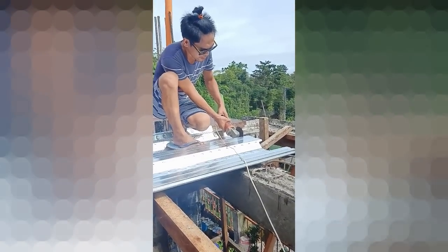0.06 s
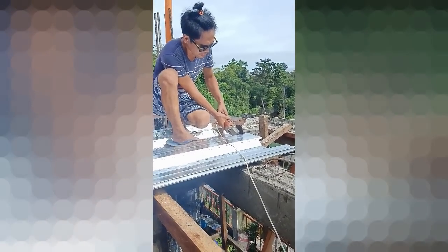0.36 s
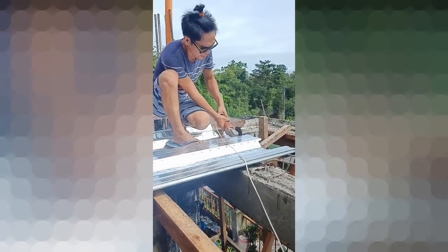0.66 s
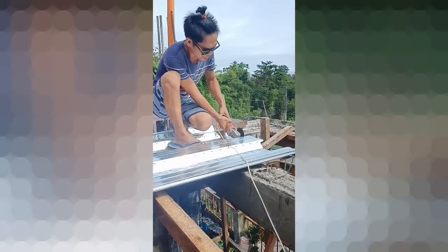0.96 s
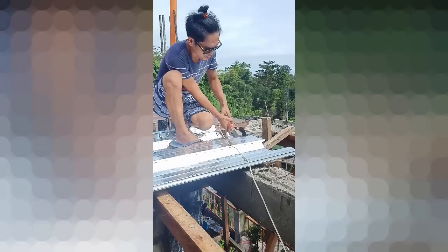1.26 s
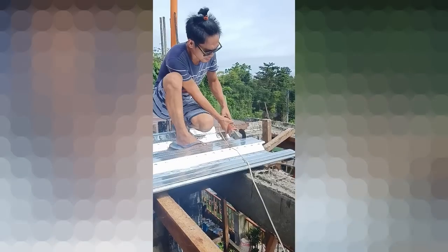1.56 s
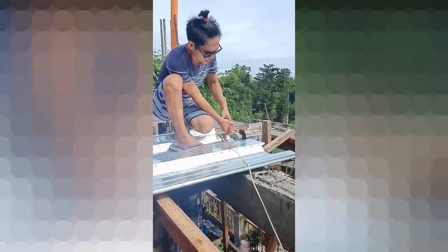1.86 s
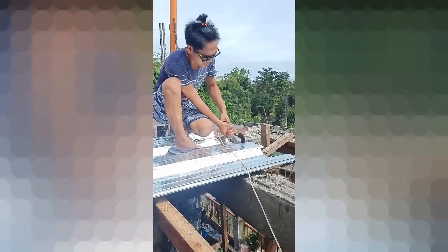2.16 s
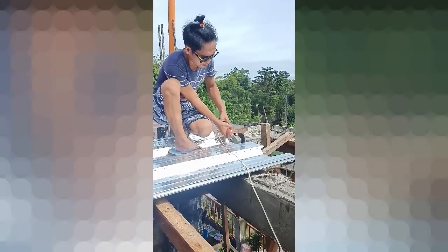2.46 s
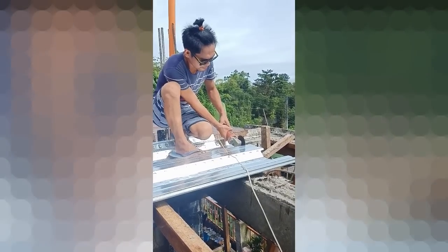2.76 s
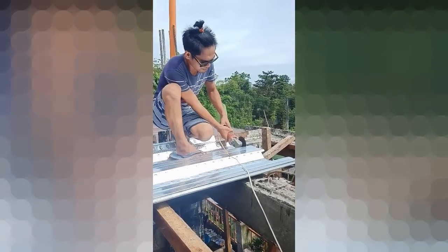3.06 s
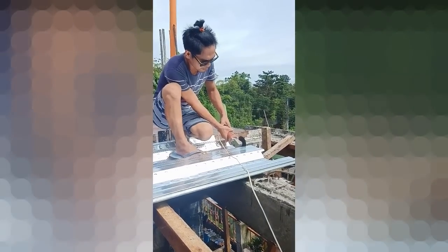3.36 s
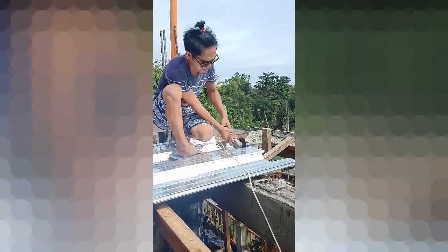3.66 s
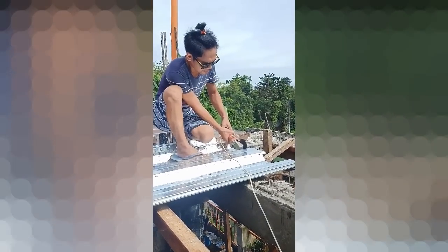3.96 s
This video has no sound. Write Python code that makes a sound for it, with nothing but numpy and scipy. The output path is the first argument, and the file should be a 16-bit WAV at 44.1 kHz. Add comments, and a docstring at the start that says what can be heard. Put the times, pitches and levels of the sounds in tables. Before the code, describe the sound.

Continuous buzzing whine of a disc cutter grinding sheet metal outdoors, light gusts crackling.

```python
"""Disc cutter on roofing sheet

A hand-held cutter works through thin sheet on an open building site, some metres away. The disc bites
once a turn, a periodic force whose overtones slide through the sheet's resonances as it slows under load.
Single overtones lock on and squeal; the abrasive edge rasps and hisses all along.
Gusts buffet the left port of the microphone with rumble, crackle and pops."""
import sys
import numpy as np
from scipy import signal
from scipy.fft import rfft, irfft
from scipy.io import wavfile
from scipy.ndimage import uniform_filter1d

SR = 44100
rng = np.random.default_rng(int(sys.argv[2]) if len(sys.argv) > 2 else 0)


def to_wav(sig):
    """Store sig (one row per channel, or 1-D mono) as 16-bit WAV at the path in sys.argv[1].

    Samples outside -1..1 are clipped; the rate is SR.
    """
    pcm = np.clip(np.atleast_2d(sig), -1, 1) * 32767
    pcm = np.round(pcm).astype(np.int16)
    wavfile.write(sys.argv[1], SR, pcm.T)  # frames by channels


N = 176400
PORT_PHASE_RAD = 0.83  # scale of the phase spread between the microphone's ports

# Relative strength of the abrasive noise: time_s, rasp_db, hiss_db
GRINDING_LEVELS = [(0.0, -67, -59), (0.27, -65, -65), (0.78, -62, -62.5), (0.92, -54.5, -64.5),
                   (1.08, -52.5, -65), (1.5, -52.5, -61), (1.62, -48, -62.5), (1.73, -52, -62),
                   (1.83, -52, -62.5), (1.92, -46, -59.5), (2.1, -55, -64.5), (2.91, -53, -63.5),
                   (3.06, -48.5, -60), (3.27, -55, -62), (3.54, -53.5, -58), (3.7, -67, -62.5),
                   (4.0, -61, -61.5)]


def undb(db):
    """Amplitude ratio of a level in decibels."""
    return 10 ** (np.asarray(db) / 20)


def unit(x):
    """Normalisation to an RMS of 1."""
    return x / np.sqrt(np.mean(x ** 2))


def curve(rows, column=1):
    """Linear interpolation of one table column over time."""
    rows = np.array(rows)
    return np.interp(np.arange(N) / SR, rows[:, 0], rows[:, column])


def bins():
    """Frequencies of the spectrum in Hz."""
    return np.arange(N // 2 + 1) * SR / N


def colour(rows):
    """Gains for each dB column of a table, interpolated over log frequency."""
    hz, *columns = np.array(rows, float).T
    return undb([np.interp(np.log(bins() + 1), np.log(hz), db) for db in columns])


def wander(size, step):
    """Low-pass noise of RMS 1, correlated over about step points."""
    step = max(int(step), 1)
    smoothed = uniform_filter1d(rng.standard_normal(size), step, mode="wrap")
    return unit(uniform_filter1d(smoothed, step, mode="wrap"))


def ring(x, gain):
    """Causal, minimum-phase filter with the given gains over frequency."""
    cepstrum = irfft(np.log(gain + 1e-9), N)
    cepstrum[..., 1:N // 2] *= 2
    cepstrum[..., N // 2 + 1:] = 0
    return irfft(rfft(x) * np.exp(rfft(cepstrum)), N)


def clicks(times, sizes, order=8):
    """Band-limited impulses, placed between samples by a windowed sinc."""
    at = times[:, None] * SR
    index = at.astype(int) + np.arange(1 - order, order + 1)
    shape = np.sinc(index - at) * np.sinc((index - at) / order)
    return np.bincount((index % N).ravel(), (sizes[:, None] * shape).ravel(), N)


def wind(eddies_per_s=420, spit_hz=2230, flicker_db=2.5, right_port_db=-48):
    """Turbulent pressure at the left port: gusts rumble, eddies crackle and now and then pop."""
    # Gusts on the microphone: centre_s, length_s, relative_db
    gusts = [(0.034, 0.13, -48), (0.274, 0.34, -48.5), (0.533, 0.14, -46), (0.734, 0.056, -59),
             (0.895, 0.32, -53), (1.072, 0.023, -53), (1.236, 0.02, -50.5), (1.323, 0.19, -53),
             (1.465, 0.059, -43.5), (1.523, 0.028, -54), (1.639, 0.072, -47.5), (1.87, 0.031, -50.5),
             (1.924, 0.046, -45), (2.057, 0.018, -48.5), (2.187, 0.048, -57.5), (2.606, 0.026, -56),
             (2.677, 0.01, -53), (3.331, 0.0089, -47.5), (3.424, 0.014, -45), (3.559, 0.053, -49.5),
             (3.67, 0.08, -53), (3.831, 0.025, -48.5), (3.95, 0.11, -53.5)]
    # Single hard pressure pulses: time_s, relative_db, half_width_s
    pulses = [(0.594, -38, 0.00026), (0.7, -37, 0.00023), (0.725, -32, 0.00038), (0.741, -31, 0.0002),
              (0.764, -36, 0.00028), (0.815, -32, 0.00021), (0.864, -31.5, 0.00023), (0.913, -36, .0003),
              (0.927, -31.5, 0.00021), (0.961, -37.5, 0.00038), (1.076, -34.5, 0.00038),
              (1.232, -44, .0006), (1.303, -39, 0.00035), (1.435, -31, 0.00021), (1.464, -27.5, 0.00015),
              (1.521, -39, 0.00035), (1.613, -38.5, .0004), (1.656, -36, 0.00039), (2.68, -47, 0.00035),
              (3.326, -41.5, 0.00025), (3.435, -47, .0003), (3.531, -39, .00025), (3.581, -40.5, 0.00066),
              (3.788, -34.5, 0.00033), (3.838, -36.5, 0.0012)]
    # Spectra of the turbulence: frequency_hz, rumble_db, pop_db
    spectra = [(19.8, -44, -29), (50.7, -15, -27), (90, -1, -3), (143, -2.5, 2), (295, -5.5, 3),
               (755, -10, 5), (1610, -31.5, -3), (3100, -35, -28.5), (9000, -33, -33)]
    # Crackle of the dying breeze: time_s, level_db
    breeze = [(0, -44), (.2, -46.5), (.4, -49.5), (.54, -45), (.66, -55), (.92, -52.5), (1.1, -60.5),
              (1.45, -72), (1.8, -75.5), (3.2, -62.5), (3.6, -62), (4, -80)]
    t = np.arange(N) / SR
    rumble_gain, pop_gain = colour(spectra)
    gusting = sum(undb(db) * np.exp(-2 * ((t - at) / length) ** 2) for at, length, db in gusts)
    turbulence = rng.standard_normal(N) * undb(flicker_db * wander(N, SR * 0.011))
    rumble = unit(ring(turbulence, rumble_gain)) * (undb(-84) + gusting) * undb(-2)

    count = int(eddies_per_s * N / SR)
    when, sign = rng.random((N // 20, 2))[:count].T
    scatter_db = 4 * np.clip(rng.standard_normal(N // 20)[:count], -2, 2)
    eddies = clicks(when * N / SR, np.sign(sign - .5) * undb(scatter_db))
    breeze_db = curve(breeze)
    spit = unit(ring(eddies, 1 / (1 + np.log((bins() + 1) / spit_hz) ** 2 / 0.14) ** 2))
    spit_db = -7 + (breeze_db + 50) / 2  # a stronger breeze crackles more brightly
    crackle = (unit(ring(eddies, pop_gain)) + spit * undb(spit_db)) * undb(breeze_db)

    # Each pop is a dip in pressure with a rebound.
    pops = sum(undb(db + 1) * (1.1 * (t - at) / width - 1) * np.exp(-((t - at) / width) ** 2)
               for at, db, width in pulses)
    port = rumble + crackle + ring(pops, np.sqrt(pop_gain))
    return port * undb([[0], [right_port_db]])


def sheet_response(extra_width_hz=0, bass_hz=170, treble_hz=10000):
    """Modal superposition: Lorentzian resonances add in power to a broad response, left and right."""
    # Resonances of the sheet: frequency_hz, width_hz, left_db, right_db
    modes = [(832, 44, -14, -8), (889, 7.7, -3, -24), (1160, 5.2, -18, -13), (1247, 2.6, -19, -6.5),
             (1296, 18, -3.5, -18.5), (1450, 97, -19, -7), (1933, 90, -4, -6.5), (2015, 51, -15, -6),
             (2193, 14.5, -3.5, -4.5), (2340, 20, -14, -18), (2970, 130, -9, -19), (3000, 25, -2.5, -10),
             (3255, 61, -17, -13.5), (3420, 50, -27.5, -15), (4040, 28, -19.5, -27)]
    # Broad response of sheet and tool: frequency_hz, left_db, right_db
    body = [(140, -29.5, -26), (202, -40, -55), (280, -28, -25), (545, -25.5, -17), (1100, -10.5, -12.5),
            (1570, -20.5, -22), (2097, -7.5, -14.5), (2660, -15, -10), (3180, -22, -16.5),
            (3500, -15.5, -25), (4560, -19.5, -20), (5360, -24.5, -29.5), (6040, -16.5, -13.5),
            (7530, -27.5, -35.5), (8600, -34, -58)]
    power = colour(body) ** 2
    for hz, width, *db in modes:
        widened = abs(width) + extra_width_hz
        peak = (width / widened) * undb(db)[:, None] ** 2
        power = power + peak / (1 + (2 * (bins() - hz) / widened) ** 2)
    rolloff = 1 + (bass_hz / (bins() + 1)) ** 4 + (bins() / treble_hz) ** 4
    return np.sqrt(abs(power) / rolloff)


def radiate(x, spread_s=.007, right_lag_s=.00003, dense_hz=3300):
    """Dispersion gives each frequency its own delay; crowded high modes ripple the treble."""
    hz = bins()
    drift = lambda step_hz: wander(len(hz), step_hz * N / SR)
    stereo_ripple = lambda: np.array([drift(60), drift(60)])
    crowding = np.minimum(hz / dense_hz, 1)
    group_delay_s = spread_s * abs(drift(200))
    phase = 2 * np.pi * np.cumsum(group_delay_s) * SR / N
    phase = phase + PORT_PHASE_RAD * (.5 + crowding) * stereo_ripple()
    phase[1] += 2 * np.pi * hz * right_lag_s
    ripple_db = 4 * crowding ** 2 * stereo_ripple()
    return irfft(rfft(x) * undb(ripple_db) * np.exp(-1j * phase), N)


def flex(x, depth_db=2.5, swell_s=0.12, band_hz=200, size=1024):
    """Time-varying response: narrow bands swell and fade as the sheet flexes and the cut advances."""
    spectra = signal.stft(x, nperseg=size)[2]
    field = rng.standard_normal(spectra.shape)
    for _ in range(2):
        field = uniform_filter1d(field, max(round(band_hz * size / SR), 1), axis=1)
        field = uniform_filter1d(field, max(round(swell_s * 2 * SR / size), 1), axis=2)
    return signal.istft(spectra * undb(depth_db * unit(field)), nperseg=size)[1][:, :N]


def disc_turns(flutter=.001, chatter_turns=.005, full_load_db=-47):
    """Disc angle in turns: the integral of speed, plus stick-slip chatter that grows with the rasp."""
    # Rotation rate of the disc: time_s, speed_hz
    rotation = [(0.0, 130.83), (0.3, 129.64), (0.48, 131.34), (0.52, 133.17), (0.68, 135.66), (0.8, 139.89),
                (0.92, 140.33), (1.0, 139.09), (1.08, 139.29), (1.28, 145.78), (1.34, 147.01),
                (1.42, 147.19), (1.58, 141.66), (1.68, 142.4), (1.8, 150.1), (1.86, 151.17), (1.96, 148.72),
                (2.02, 146.17), (2.18, 146.91), (2.3, 146.9), (2.42, 148.33), (2.72, 142.54),
                (2.94, 142.22), (3.02, 140.05), (3.14, 133.76), (3.22, 130.7), (3.44, 127.32),
                (3.58, 121.6), (3.74, 120.6), (4.0, 121.84)]
    speed_hz = curve(rotation) * (1 + flutter * wander(N, SR * 0.03))
    load = np.minimum(undb(curve(GRINDING_LEVELS) - full_load_db), 1)
    chatter = chatter_turns * load * wander(N, SR * .008)
    return np.cumsum(speed_hz) / SR + chatter


def grinding(turns, pulsing=0.076, grit_db=0.6):
    """Friction noise: abrasive grains, swelling with each turn, rasp the sheet and hiss at the cut."""
    # Spectrum of the abrasive hiss: frequency_hz, left_db, right_db
    hiss_spectrum = [(40.3, -67, -40), (121, -25, -25), (298, -27.5, -27), (484, -13, -22),
                     (855, -13.5, -20.5), (1630, -3, -12.5), (1790, -10.5, -5.5), (1955, 2, -4.5),
                     (2270, -4, -3), (3130, -8.5, -11.5), (3450, -12.5, -21), (4400, -15, -18.5),
                     (5380, -19.5, -14), (5930, -13, -7.5), (6820, -20.5, -22.5), (7860, -18, -18),
                     (8900, -25.5, -34.5), (12900, -25.5, -31.5), (15700, -33.5, -46)]
    swell = np.exp(pulsing * (np.cos(2 * np.pi * turns) + np.cos(4 * np.pi * turns)))
    grains = swell * undb(-grit_db * wander(N, SR * 0.00026))
    vibration = ring(grains * rng.standard_normal(N), sheet_response(extra_width_hz=24))
    rasp = unit(flex(radiate(vibration)))
    cut_noise = ring(rng.standard_normal((2, N)), colour(hiss_spectrum))
    hiss = unit(grains * radiate(cut_noise))
    rasp_db = curve(GRINDING_LEVELS) - 3
    hiss_db = curve(GRINDING_LEVELS, column=2) + 9.5
    return rasp * undb(rasp_db) + hiss * undb(hiss_db)


def squeals(turns, fade_s=0.057, waver_s=0.045, rough_s=0.0046):
    """Mode lock-in: the sheet hums or squeals on harmonics of the rotation, the higher ones rougher."""
    # Spells of lock-in: start_s, end_s, harmonic_number, left_db, right_db
    spells = [(0, 0.4, 23, -68, -70), (0, 0.177, 15, -56, -74), (0.58, 0.77, 14, -60, -71),
              (0.797, 1.2, 6, -68, -60.5), (0.84, 0.97, 29, -65, -65), (0.942, 1.02, 21, -60, -56.5),
              (1.19, 1.676, 28, -62, -67), (1.197, 1.42, 14, -57.5, -68), (1.27, 1.493, 21, -61, -59),
              (1.34, 1.495, 13, -57.5, -66), (1.447, 1.54, 29, -54, -61), (1.52, 1.69, 6, -62, -55),
              (1.52, 1.68, 14, -62, -63), (1.738, 2.367, 13, -61, -66.5), (1.764, 2.004, 14, -53, -54),
              (1.802, 1.894, 5, -59, -62), (1.855, 1.95, 28, -57, -68), (1.875, 1.97, 17, -64, -54),
              (1.91, 2.387, 15, -53.5, -53.5), (1.978, 2.42, 21, -73, -59), (2.017, 2.604, 28, -67, -72),
              (2.404, 2.504, 6, -51.5, -52.5), (2.41, 2.518, 15, -54, -53), (2.607, 2.693, 21, -54.5, -73),
              (2.617, 3.017, 9, -78, -57), (2.62, 3.08, 6, -61, -55.5), (2.68, 3.067, 10, -55, -64),
              (2.702, 2.98, 22, -77, -60.5), (2.104, 2.335, 7, -68, -67), (1.402, 1.66, 15, -58, -62),
              (3.028, 3.158, 9, -48.5, -48.5), (3.083, 3.587, 1, -69.5, -71.5), (3.1, 3.49, 2, -73.5, -75),
              (3.122, 3.2, 16, -53, -55), (3.143, 3.36, 9, -57.5, -57), (3.2, 3.616, 8, -58, -63),
              (3.29, 3.384, 10, -61, -57), (3.34, 3.46, 28, -56, -61), (3.388, 3.49, 7, -55.5, -58),
              (3.4, 3.616, 16, -56, -58), (3.49, 3.6, 18, -52, -53), (3.597, 3.76, 25, -61, -70),
              (3.6, 3.719, 24, -57, -62), (3.594, 3.8, 30, -64, -74), (3.685, 4.007, 19, -62, -57),
              (3.763, 4.003, 15, -56.5, -65), (3.944, 4.015, 52, -61, -61)]
    t = np.arange(N) / SR
    out = np.zeros((2, N))
    waver, rough = (wander(2 * N, SR * s) + 1j * wander(2 * N, SR * s) for s in (waver_s, rough_s))
    for start, end, harmonic, *db in spells:
        envelope = np.clip(np.minimum(t - start, end - t) / fade_s + .5, 0, 1)
        on = np.flatnonzero(envelope)
        places = on + rng.integers(0, N, (2, 1))  # each spell wavers in its own way
        grip = 1 + .25 * waver[places] + .33 * (harmonic / 12) ** .5 * rough[places[0]]
        phase = 2 * np.pi * (round(harmonic) * turns[on] + rng.random())
        port_phase = PORT_PHASE_RAD * np.array([[1], [-1]]) * rng.uniform(0.14, 1.0)
        tone = np.sqrt(2) * np.real(grip * np.exp(1j * (phase + port_phase)))
        out[:, on] += undb(db)[:, None] * envelope[on] * tone
    return out * undb(0.5)


def bites(turns, jitter_s=.000014, scatter_db=1.3, split_hz=1800):
    """Forced vibration: one slightly uneven impact per turn rings the sheet in a drone and a whine."""
    # Strength of the low overtones: time_s, relative_db
    drone_levels = [(0.0, 6.5), (0.45, -5), (0.8, -1), (1.2, -5), (1.6, 2.5), (1.75, 0.5), (2.0, 4),
                    (2.3, 1), (2.45, 4), (2.55, 2.5), (2.7, 1), (3.05, 6.5), (3.25, 6.5), (3.45, 6.5),
                    (3.7, 2), (4.0, 4.5)]
    # Strength of the high overtones: time_s, relative_db
    whine_levels = [(0.0, -5), (0.3, -1.5), (0.5, -4.5), (0.78, -5), (0.92, 1), (1.12, -2), (1.4, -0.5),
                    (1.62, 4.5), (1.74, -5.5), (1.92, 4.5), (2.05, -0.5), (2.4, -0.5), (2.55, 2),
                    (2.9, 0.5), (3.2, 3.5), (3.55, 5), (3.72, 4), (4.0, 3.5)]
    times = np.interp(np.arange(1, int(turns[-1])), turns, np.arange(N) / SR)
    late, size = rng.standard_normal((N // 200, 2))[:len(times)].T
    impacts = clicks(times + jitter_s * late, undb(scatter_db * size))
    vibration = ring(impacts, sheet_response())
    tone = unit(flex(radiate(vibration)))
    drone = irfft(rfft(tone) / (1 + (bins() / split_hz) ** 16), N)
    whine = tone - drone
    return drone * undb(curve(drone_levels) - 53) + whine * undb(curve(whine_levels) - 50)


def scene():
    """Superposition of the cutter's sounds, all tied to one rotation, and wind on the microphone."""
    turns = disc_turns()
    return bites(turns) + squeals(turns) + grinding(turns) + wind()


def record(dry):
    """Band limiting: the recorder's steep low-pass filter cuts the top of the treble."""
    cutoff_hz = 15450
    return signal.sosfilt(signal.ellip(10, .2, 70, cutoff_hz, fs=SR, output="sos"), dry)


dry = scene()
out = record(dry)
to_wav(out)
```